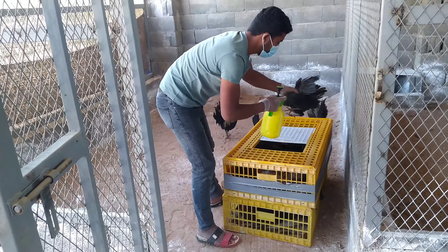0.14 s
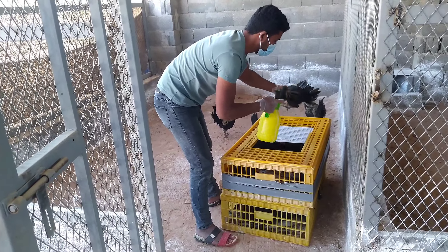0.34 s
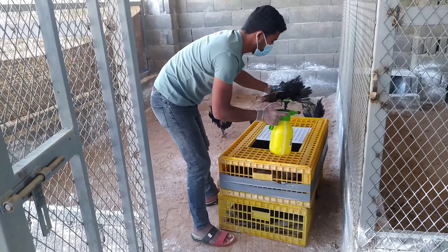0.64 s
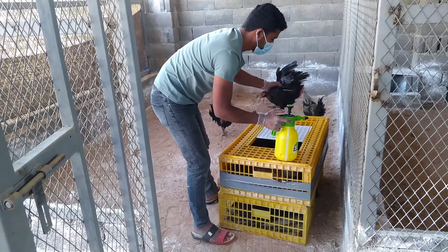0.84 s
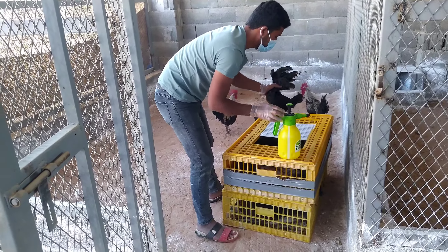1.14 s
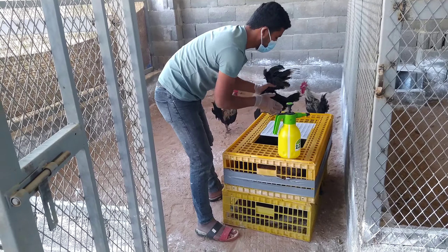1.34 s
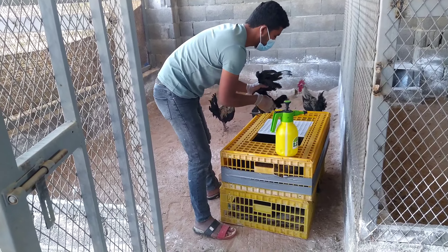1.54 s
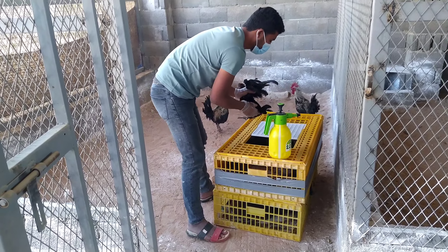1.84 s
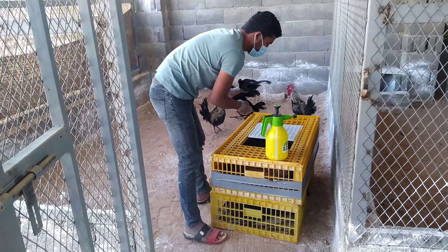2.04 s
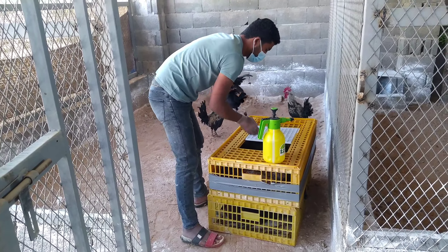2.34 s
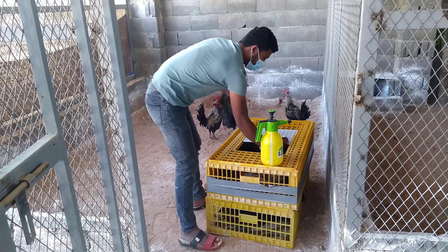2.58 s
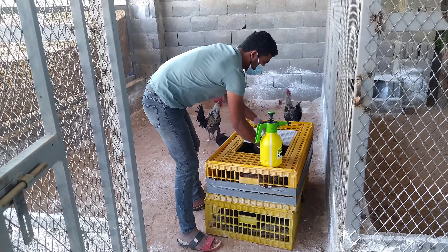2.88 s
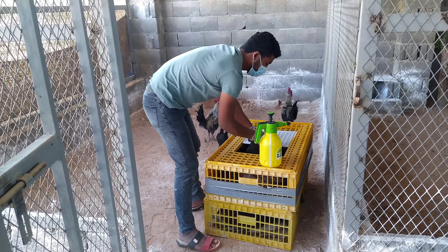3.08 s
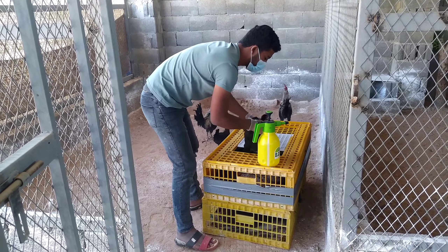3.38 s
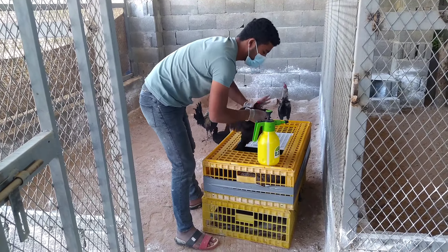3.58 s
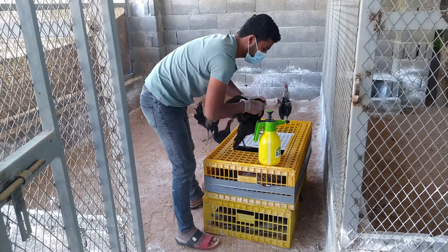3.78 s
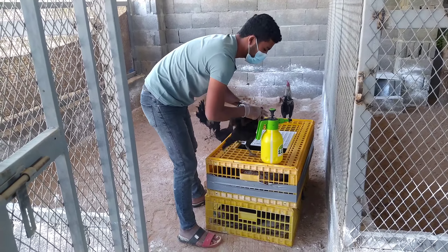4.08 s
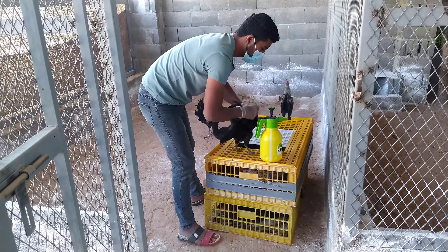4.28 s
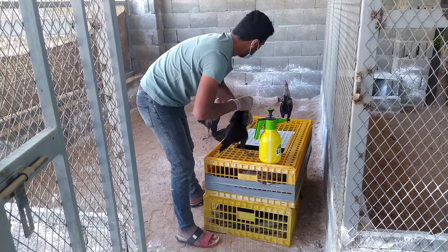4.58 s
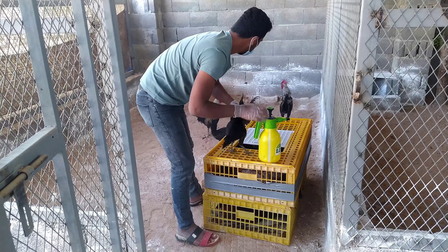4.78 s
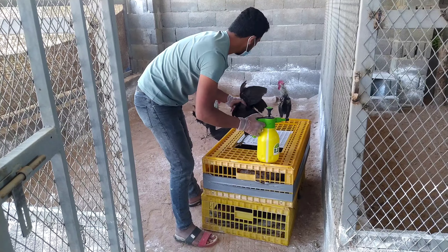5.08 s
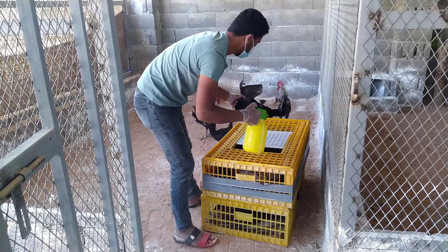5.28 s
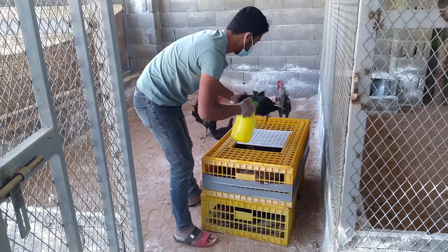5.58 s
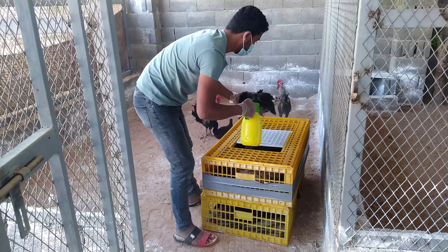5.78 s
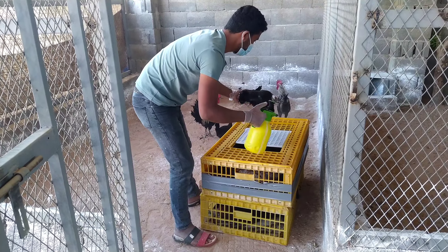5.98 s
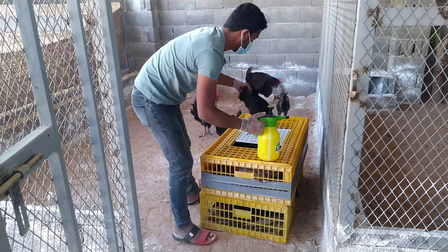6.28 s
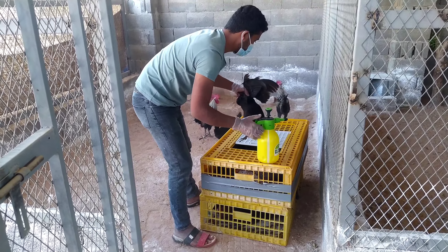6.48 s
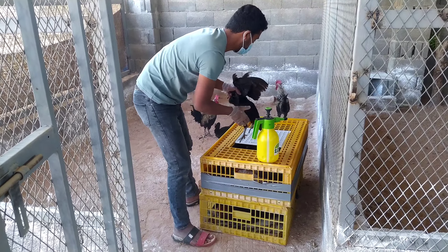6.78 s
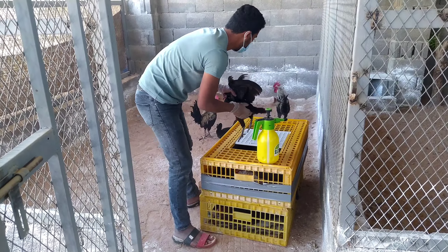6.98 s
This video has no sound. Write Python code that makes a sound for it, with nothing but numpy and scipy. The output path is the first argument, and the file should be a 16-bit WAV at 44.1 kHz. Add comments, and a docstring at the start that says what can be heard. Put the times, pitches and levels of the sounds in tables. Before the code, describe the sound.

Right away a harsh squawk with a whistling edge, then weaker rough cries mixed with low, round clucks. Rustling and ticks on plastic lead to the loudest, sharp squawks mid-way, followed by drawn-out raspy cries. A run of soft clucks follows with faint hens answering behind, and a last breathy, hissing squawk continues to the end. Block-walled pen with brief reverberation, faint outdoor wash, handheld stereo pickup.

```python
"""A hen squawks hoarsely over soft clucks, single notes, bumps, ticks, rustling and faint bursts of high hiss.
She is held over plastic crates in a block-walled pen; a young bird peeps once and hens further back answer.
Her voice is a beating syrinx that breaks into noise, shaped by windpipe, throat and beak; clucks and notes
are sums of sine waves. Crates ring as fading sines; rustle, ticks, high hiss and farmyard wash are coloured
noise. Echoes, scatter and a fading tail stand for the pen around all but the wash."""
import sys
import numpy as np
from scipy import signal
from scipy.fft import rfft, irfft, next_fast_len
from scipy.io import wavfile
from scipy.ndimage import uniform_filter1d, map_coordinates

SR = 44100
rng = np.random.default_rng(int(sys.argv[2]) if len(sys.argv) > 2 else 0)


def unload_audio(sound):
    """Save the sound as a 16-bit wav file, at the path given as the first command line argument."""
    columns = np.transpose(np.atleast_2d(sound))
    # keep every value between -1 and 1, then stretch to whole-number steps
    steps = np.round(np.clip(columns, -1, 1) * 32767)
    wavfile.write(sys.argv[1], SR, steps.astype(np.int16))


N = 314433  # length of the scene in samples
TIME = np.arange(N) / SR  # s

# spectrum of rubbing on the crate: (frequency [Hz], density [dB per Hz])
RUB_COLOUR = [(50, -22), (110, -13), (160, -2), (230, -2), (320, 0), (480, -5), (700, -10), (2000, -19),
              (6000, -31), (9000, -27), (15000, -52)]


def amp(db):
    """Turns decibels into a gain."""
    return 10 ** (np.asarray(db) / 20)


def unit(x):
    """Scales a sound to rms 1."""
    return x / np.sqrt(np.mean(x ** 2) + 1e-20)


def read(points, hz):
    """Reads a table of (frequency, value) along a logarithmic frequency axis."""
    f, value = np.transpose(points)
    return np.interp(np.log(hz + 1), np.log(f + 1), value)


def along(rows, t):
    """Reads every column of a curve at the times t."""
    s, *columns = np.transpose(rows)
    return [np.interp(t, s, column) for column in columns]


def add(mix, s, sound):
    """Adds a sound to the mix at time s, cutting what falls outside."""
    start = round(s * SR)
    sound = sound[max(-start, 0):]
    part = mix[max(start, 0):][:len(sound)]
    part += sound[:len(part)]


def colour(x, points):
    """Filters a sound by a curve of (frequency [Hz], level [dB])."""
    n = x.shape[-1]
    size = next_fast_len(n + 2048)
    gain = amp(read(points, np.fft.rfftfreq(size, 1 / SR)))
    return irfft(rfft(x, size) * gain, size)[..., :n]


def wobble(n, hz):
    """Makes a smooth random curve of about rms 1 that varies at rates up to about hz."""
    size = next_fast_len(n + 4096)
    f = np.fft.rfftfreq(size, 1 / SR)
    smooth = rfft(rng.standard_normal(size)) / (1 + (f / hz) ** 4)
    return unit(irfft(smooth, size))[:n]


def resonate(x, hz, width):
    """Rings like a cavity whose pitch follows hz, with a peak gain of about 1."""
    turn = np.exp(2j * np.pi * np.cumsum(hz * np.ones(len(x))) / SR)
    r = np.exp(-np.pi * width / SR)
    # shift the resonance to zero frequency, smooth there, and shift back
    return 2 * (turn * signal.lfilter([1 - r], [1, -r], x / turn)).real


def resonate_twice(x, hz, width):
    """Passes a sound through two equal resonances, for a steeper peak."""
    return resonate(resonate(x, hz, width), hz, width)


def steady(x):
    """Holds the rms near 1 over some tens of milliseconds, leaving the fast grain."""
    power = uniform_filter1d(uniform_filter1d(x ** 2, size=900), size=900)
    return x / np.sqrt(abs(power) + 1e-12)


def diffuse(pair):
    """Makes two unrelated signals alike in the bass, as at two close microphones."""
    # left-right likeness of diffuse sound: (frequency [Hz], likeness [0-1])
    likeness = [(30, 0.036), (120, 1), (600, 0.71), (900, 0.82), (1250, 0.16), (2000, 0.015),
                (12000, 0.007)]
    n = pair.shape[-1]
    size = next_fast_len(n)
    a, b = rfft(pair, size)
    same = np.clip(read(likeness, np.fft.rfftfreq(size, 1 / SR)), -1, 1)
    return irfft(np.array([a, same * a + np.sqrt(1 - same ** 2) * b]), size)[:, :n]


def strokes(rows, edge):
    """Draws the level of strokes that rise, hold and fall; edge is the share spent rising and falling."""
    level = np.zeros(N)
    for s, length, level_db in rows:
        add(level, s, amp(level_db) * signal.windows.tukey(int(length * SR), edge))
    return level


def pen(x, echo_db, scatter_db, tail_db):
    """Adds first echoes, quick scatter off crates and mesh, and a tail that fades between the walls."""
    # how long the tail rings: (frequency [Hz], time to fall 60 dB [s])
    tail_t60 = [(150, 0.32), (500, 0.24), (1000, 0.4), (2500, 0.31), (5000, 0.28), (10000, 0.21)]
    # echoes off floor, crate and walls, ahead of echo_db: (left delay [s], right delay [s], gain [ratio])
    first_echoes = [(.0031, .0034, .3), (.0074, .0071, .25), (.0132, .0133, .42), (.0205, .0209, .2),
                    (.0271, .0267, .2)]
    scatter_t60, tail_rise = 0.072, 0.019  # s
    size = 32768
    hz, t, z = signal.stft(rng.standard_normal((2, size)), SR, nperseg=256)
    fading = z * amp(-60 * t / read(tail_t60, hz)[:, None])
    tail = signal.istft(fading, SR, nperseg=256)[1][:, :size]
    t = TIME[:size]
    tail = tail * np.clip(t / tail_rise, 0, 1)
    scatter = rng.standard_normal((2, size)) * amp(-60 * t / scatter_t60) * (t > .001)
    scatter = colour(scatter, [(500, -49.5), (1000, 1), (1800, -1)])
    response = diffuse(amp(tail_db) * unit(tail) + amp(scatter_db) * unit(scatter)) / np.sqrt(size)
    response[:, 0] += 1  # the direct sound
    for left, right, gain in first_echoes:
        response[[0, 1], [round(left * SR), round(right * SR)]] += gain * amp(echo_db)
    response = response / np.linalg.norm(response.mean(0))
    return signal.fftconvolve(x[None], response, axes=1)[:, :N]


def air():
    """The quiet wash of the farmyard: coloured noise that drifts and slowly sinks."""
    # spectrum of the wash: (frequency [Hz], density [dB per Hz])
    wash_colour = [(12, -44), (20, 9.5), (119, -0.5), (351, 5.5), (490, 1.5), (878, -3), (1040, 1.5),
                   (1710, 2.5), (2530, 0.5), (4050, -8), (5060, -14.5), (7070, -14.5), (9080, -3.5),
                   (13000, -24.5), (15400, -45)]
    start_db, fall_db_per_s, drift_db = -48, 0.5, 1
    level_db = start_db - fall_db_per_s * TIME + drift_db * wobble(N, 0.72)
    return amp(level_db) * unit(diffuse(colour(rng.standard_normal((2, N)), wash_colour)))


def high_hiss():
    """Faint bursts of high hiss: treble noise that swells and fades."""
    # spectrum of the hiss: (frequency [Hz], density [dB per Hz])
    hiss_colour = [(2000, -47), (5500, -3.5), (7000, -5.5), (9000, 4.5), (11000, -8), (15000, -12)]
    # bursts: (start [s], length [s], level [dB])
    bursts = [(.38, 0.23, -53), (3.985, 0.092, -51), (4.56, 0.26, -56), (5.62, 0.57, -60)]
    return strokes(bursts, edge=0.27) * unit(colour(rng.standard_normal(N), hiss_colour))


def rustle():
    """Feathers and hands brush the plastic in uneven clumps, and the hollow crate booms under them."""
    # rubbing strokes, ahead of gain_db: (start [s], length [s], level [dB])
    rubs = [(.12, 0.034, -42), (2.8, 0.361, -36.5), (3.298, 0.031, -28), (5.28, .62, -55.5),
            (6.66, 0.44, -42.5)]
    gain_db, clump_db = -1, 3.5
    boom_hz, boom_width_hz, boom_db = 167, 17, 8
    clumps = amp(clump_db * wobble(N, 35))
    grains = colour(rng.standard_normal(N) * clumps, RUB_COLOUR)
    boom = amp(boom_db) * resonate(grains, boom_hz, boom_width_hz)
    return amp(gain_db) * strokes(rubs, edge=0.18) * unit(grains + boom)


def crate():
    """Soft blows ring the hollow crate as fading sines; claws and hard edges tick on it as short noise."""
    # dull bumps, ahead of bump_db: (time [s], level [dB], scuff's time to fall 60 dB [s], panel pitch [Hz])
    bumps = [(0.138, -46, 0.16, 336), (0.305, -53, 0.14, 402), (0.683, -39.5, 0.094, 230),
             (1.098, -38, 0.47, 318), (2.27, -40.5, 0.35, 402), (2.574, -37, 0.15, 303),
             (2.809, -37.5, 0.23, 310), (2.837, -36, 0.15, 290), (2.875, -37, 0.13, 464),
             (3.303, -30, 0.058, 304), (3.999, -41, 0.23, 284), (5.011, -39.5, 0.31, 335),
             (6.515, -39.5, 0.56, 410)]
    # ringing tones, their pitch scattered at each bump: (pitch [Hz], level [dB], time to fall 60 dB [s])
    tones = [(165.2, -11.5, 0.8), (212, -6.5, 0.15), (414, -18, 0.63), (569, 7.5, 0.065), (667, 0.5, 0.26)]
    # ticks of claws and plastic: (time [s], level [dB])
    tick_times = [(0.1863, -31.5), (1.165, -42), (1.669, -42.5), (2.804, -29.5), (2.832, -35.5),
                  (2.875, -31), (3.3093, -34), (6.5364, -43.5), (6.856, -37)]
    # spectrum of a tick: (frequency [Hz], density [dB per Hz])
    tick_colour = [(300, -19), (1500, 14), (4000, 12), (6000, 8), (8500, 20), (11000, 9.5), (15000, -12)]
    bump_db, panel_db, sink_db = -2, 11, 4.5
    tick_t60, panel_t60 = 0.12, 0.084  # s
    sink_from_hz, sink_to_hz, sink_s = 324.6, 134, 0.0216
    out = np.zeros(N)
    t = np.arange(SR // 3) / SR
    for s, level_db, scuff_t60, panel_hz in bumps:
        ring = np.zeros(len(t))
        for hz, db, t60 in tones:
            tone = np.sin(2 * np.pi * hz * rng.uniform(.92, 1.08) * t)
            ring += amp(db - 60 * t / t60) * tone * rng.choice([-1, 1])
        panel = amp(panel_db - 60 * t / panel_t60) * np.sin(2 * np.pi * panel_hz * t)
        # a low note slides down after the blow
        sink_hz = sink_to_hz + (sink_from_hz - sink_to_hz) * np.exp(-t / sink_s)
        sink_level = amp(sink_db) * t / sink_s * np.exp(-t / sink_s)
        sinking = sink_level * np.sin(2 * np.pi * np.cumsum(sink_hz) / SR)
        scuff = unit(colour(rng.standard_normal(len(t)), RUB_COLOUR)) * amp(-60 * t / max(scuff_t60, .02))
        soft_start = 1 - np.exp(-t / .004)
        add(out, s, amp(level_db + bump_db) * (ring + panel + sinking + scuff) * soft_start)
    for s, level_db in tick_times:
        tick = unit(colour(rng.standard_normal(len(t)), tick_colour))
        add(out, s, amp(level_db - 60 * t / tick_t60) * tick)
    return out


def murmur():
    """Hens further back answer the clucking with a short run of faint, higher clucks of their own."""
    count, loudest_db, spread_db = 14, -50, 5
    out = np.zeros(N)
    for k, (when, pitch, size) in enumerate(rng.random((count, 3))):
        hz = np.interp(pitch, [0, 1], (950, 1400))
        _, sound = cluck(loudest_db - spread_db * size, hz, 0.031, bend=0.38)
        add(out, np.interp((k + when) / count, [0, 1], (5.27, 5.92)), sound)  # s
    return out


def note(length, start_hz, end_hz, level_db, overtone_db):
    """A soft, nearly pure call with one overtone, which slides and wavers a little."""
    waver_hz = 9
    n = int(length * SR)
    hz = np.linspace(start_hz, end_hz, n) + waver_hz * wobble(SR, 41)[:n]
    phase = 2 * np.pi * np.cumsum(hz) / SR
    tone = unit(np.sin(phase) + amp(overtone_db) * np.sin(2 * phase))
    return amp(level_db) * tone * signal.windows.tukey(n, .5)


def cluck(level_db, hz, length, gritty=1.0, bend=1):
    """A soft low grunt jumps in pitch and loudness; the shut beak favours its second harmonic."""
    lead_db = -12  # a weaker swell goes just before the main one
    t = np.arange(-.03, .06, 1 / SR)
    n = len(t)
    glide = np.interp(t, [-.012, -.002, .006, .016, .04], [.92, .92, 1, 1.02, .92])
    turns = np.cumsum(hz / 2 * glide ** bend * (1 + .035 * wobble(8192, 200)[:n])) / SR
    partials_db = [-12.0, 7.5, -12.5, -35.0, -26.5, -47.0, -64, -27.5]
    tone = unit(sum(amp(db) * np.sin(2 * np.pi * k * turns) for k, db in enumerate(partials_db, 1)))
    grit_colour = [(120, -30.0), (330, 7), (580, 1), (750, 18.5), (1080, 15.5), (1600, -7),
                   (2500, -4.0), (5000, -17.0), (12000, -23.5)]
    grit = unit(colour(rng.standard_normal(8192), grit_colour))[:n]
    swell = np.exp(-((t - .01) / length) ** 2) + amp(lead_db) * np.exp(-((t + .008) / .006) ** 2)
    return t[0], amp(level_db) * swell * (tone + gritty * grit)


def whistles(drive, t):
    """Sharp throat resonances whistle through the rasp; also gives the share of power they take."""
    # one curve a whistle: (time [s], pitch [Hz], share of the throat's power [0-1])
    curves = [
        [(.092, 1855, 0.8), (.125, 1960, 0.8), (.15, 1930, 0.75), (.19, 1737, 0.65), (.228, 1510, .2)],
        [(.252, 2640, 0.4), (.28, 2700, 0.7), (.305, 2520, 0.04)],
        [(.628, 1430, .3), (.715, 1535, 0.62), (.755, 1560, 0.45), (.8, 1510, 0.1)],
        [(.65, 2310, 0), (.735, 2660, 0.06), (.775, 2310, 0), (.86, 2220, 0.14)],
        [(3.99, 2100, .4), (4.045, 2360, 0.45), (4.11, 2120, 0), (4.16, 2230, 0.4), (4.21, 2130, 0),
         (4.29, 2480, 0.2)],
        [(6.61, 2530, .45), (6.74, 2700, 0), (6.86, 2520, .05), (6.96, 2810, 0.13), (7.12, 2630, .15)],
    ]
    width_hz, edge_s = 113, 0.0135
    sound, taken = np.zeros((2, len(t)))
    for curve in curves:
        start, end = curve[0][0], curve[-1][0]
        if start < t[-1] and end > t[0]:
            hz, share = along(curve, t)
            fade = np.clip(np.minimum(t - start, end - t) / edge_s + .5, 0, 1)
            share = np.clip(share, 0, 1) * fade
            sound += np.sqrt(share) * steady(resonate_twice(drive, hz, width_hz))
            taken += share
    return sound, np.minimum(taken, 1)


def pulses(turns, offset):
    """Adds 16 cosines into sharp beats; an offset of 0.5 puts them on the half harmonics."""
    return unit(sum(np.cos(2 * np.pi * (k + offset) * turns) / np.sqrt(k) for k in range(1, 17)))


def syrinx(t, pitch, rough):
    """The voice organ beats, and as it grows rough its beats give way to puffs of noise."""
    # strong and weak beats alternate, which adds half harmonics: (time [s], depth [0-1])
    doubling = [(4.02, 0.3), (4.12, 0.64), (4.24, 0.6), (4.32, .05)]
    jitter, forced, breath = .042, 0.36, 4.67
    rattle, rattle_hz = 0.2, 130
    roll_hz, roll_depth, roll_stray = 70, 0.4, 0.17  # a hoarse voice rolls in uneven pulses
    n = len(t)
    turns = np.cumsum(pitch * (1 + jitter * (rough + 0.044) * wobble(SR, 207.4)[:n])) / SR
    beats = pulses(turns, 0) + along(doubling, t)[0] * pulses(turns, .5)
    beats = beats * (1 + forced * rough)
    # air escapes in a puff every cycle
    puffs = unit((0.32 + np.exp(-(turns % 1) / 0.5)) * rng.standard_normal(SR)[:n])
    roll = np.cos(2 * np.pi * np.cumsum(roll_hz * (1 + roll_stray * wobble(SR, 33.3)[:n])) / SR)
    flutter = np.exp(rough * (rattle * wobble(SR, rattle_hz)[:n] + roll_depth * roll))
    drive = ((1 - rough ** 2) * beats + breath * rough ** 1.32 * puffs) * flutter
    return drive, puffs * flutter


def squawk(curve):
    """The syrinx sounds through windpipe, throat and open beak, with rasp and hiss above."""
    # the syrinx slips between clear tone and noise:
    # (time [s], pitch [Hz], roughness [0-1], windpipe resonance [Hz])
    voice = [(.06, 733.4, 0, 780), (.082, 746, 0.33, 780), (.102, 870, 0.65, 800), (.13, 920, 0.5, 820),
             (.2, 795, 0.79, 850), (.24, 695.5, 0.5, 735), (.27, 671.3, 0.31, 696), (.31, 644, 0.63, 710),
             (.62, 747.3, 0.6, 905), (.715, 760.4, 0.56, 860), (.76, 790, 0.57, 895), (.81, 753, 0.9, 790),
             (.85, 681, 0.7, 694), (.9, 694, 0.83, 874), (1.24, 712, 0.48, 800), (1.285, 810, 0.62, 816),
             (1.33, 858, 0.42, 895), (1.4, 867, 0.62, 880), (1.44, 811.6, 0.73, 820),
             (1.48, 750, 0.57, 780), (1.87, 788, 0.4, 780), (1.96, 839, 0.8, 770), (2.07, 789, 0.8, 770),
             (2.17, 688, 0.8, 760), (2.5, 799, 0.41, 845), (2.61, 803, 0.8, 850), (2.77, 832, 0.78, 814),
             (2.86, 698, 0.68, 794), (2.905, 667.7, 0.65, 780), (2.932, 749.6, 0.23, 800),
             (2.957, 994, 0.12, 970), (2.972, 942.6, 0.32, 1030), (2.98, 723, 0.38, 750),
             (3.02, 703, 0.42, 745), (3.05, 718, 0.42, 760), (3.09, 692, 0.38, 780), (3.12, 656, 0.66, 750),
             (3.31, 738.5, 0.49, 910), (3.345, 737, 0.45, 960), (3.385, 714, 0.17, 755),
             (3.435, 696, 0.17, 730), (3.448, 673, 0.21, 695), (3.47, 697, 0.75, 880),
             (3.535, 716, 0.41, 930), (3.58, 716, 0.93, 850), (3.85, 800, 0.73, 930), (3.98, 740, 0.8, 950),
             (4.015, 750, 0.65, 1020), (4.07, 767, 0.65, 940), (4.12, 716.5, 0.43, 884),
             (4.16, 754.7, 0.46, 900), (4.21, 725, 0.52, 920), (4.25, 782, 0.49, 920), (4.31, 798, .9, 960),
             (4.5, 827, 0.98, 830), (4.8, 908.7, 0.8, 912), (4.97, 972, 0.77, 1030), (5.06, 882, 0.74, 916),
             (5.21, 858, 1.02, 900), (6.6, 876.5, 0.74, 900), (6.72, 1000, 0.94, 1000),
             (6.86, 886, 1.01, 890), (6.96, 925, 0.82, 944), (7.12, 899.6, 0.7, 880)]
    # shape of the mouth, the beak's width averaged over a squawk and the pharynx gain ahead of its trim:
    # (time [s], beak resonance width [Hz], pharynx resonance [Hz], pharynx gain [dB], rasp centre [Hz])
    mouth = [(.07, 900, 1430, 13, 3700), (.12, 700, 1820, -22, 3870), (.23, 1190, 1590, 0, 3730),
             (.29, 900, 1810, 11.5, 4100), (.63, 810, 1530, 1, 3800), (.78, 925, 1550, -3.5, 3300),
             (.89, 1120, 1580, 3.5, 3700), (1.25, 890, 1590, 3, 4460), (1.48, 990, 1570, 0, 4370),
             (1.87, 914, 1690, 1.5, 3660), (2.16, 1040, 1450, -4, 4140), (2.5, 1130, 1510, -26, 4070),
             (2.91, 950, 1320, 4, 4300), (2.97, 750, 1580, -17, 4500), (3.03, 1010, 1490, -15, 4330),
             (3.1, 1150, 1550, 6, 4400), (3.32, 744, 1620, -20, 3880), (3.56, 790, 1570, -37, 3570),
             (3.86, 1010, 1540, -2.5, 4580), (4.04, 950, 1450, -7, 4800), (4.1, 1100, 1430, -5, 3140),
             (4.17, 1200, 1360, -4, 3340), (4.28, 1110, 1340, -12, 3640), (4.48, 900, 1380, -17, 3740),
             (4.8, 1186, 1395, -10, 3600), (5.2, 1150, 1350, -17, 3700), (6.6, 850, 1520, -11, 4400),
             (6.88, 940, 1440, -13, 4040), (7.12, 1090, 1590, -7, 4160)]
    # the throat's main band: (frequency [Hz], gain [dB])
    throat_colour = [(300, -27), (850, -54), (1150, 9), (1600, 3), (2000, 1.5), (2800, 3), (3300, -3.5),
                     (4000, 7), (6000, -29)]
    # the rasp above it: (frequency [Hz], gain [dB])
    rasp_colour = [(1500, -10), (2700, -55), (3100, 9), (3500, 6.5), (4300, 2.5), (4750, 0.5),
                   (5250, -13.5), (7000, -50), (12000, -25)]
    # the hiss at the beak: (frequency [Hz], gain [dB])
    beak_hiss_colour = [(3290, -22), (5600, -2.5), (7400, 1.5), (8270, 8), (8700, 8.5), (9510, 4),
                        (11700, -12.5), (12100, -13.5), (14400, -26), (15400, -62)]
    lead_s, attack_s, release_s, release_db_per_s = .006, 0.0022, 0.078, 302
    open_s, open_db = 0.027, -1  # the treble comes in as the beak first opens
    pharynx_width, rasp_width, pipe_width = 480, 1100, 340  # Hz
    tremor_db, pharynx_trim_db, rasp_even = 1.0, -2, 0.47
    throat_db, pipe_db, rasp_db, hiss_db = 1.5, 1.0, 1.0, -0.1

    start, end = curve[0][0] - lead_s, curve[-1][0]
    t = np.arange(start, end + release_s, 1 / SR)
    level_db, beak_hz, low_db, high_db, top_db = along(curve, t)
    pitch, rough, pipe_hz = along(voice, t)
    beak_width, pharynx_hz, pharynx_db, rasp_hz = along(mouth, t)
    release_db = release_db_per_s * np.maximum(t - end, 0)
    effort_db = level_db - release_db + tremor_db * wobble(SR, 13.0)[:len(t)]
    drive, gusts = syrinx(t, pitch, np.clip(rough, 0, 1))

    beak = resonate_twice(drive, beak_hz, beak_width.mean())
    pharynx = amp(pharynx_db + pharynx_trim_db) * resonate_twice(drive, pharynx_hz, pharynx_width)
    whistle, share = whistles(drive, t)
    throat = np.sqrt(1 - share) * steady(colour(beak - pharynx, throat_colour)) + whistle
    pipe = resonate_twice(drive, pipe_hz, pipe_width)
    pipe = colour(pipe, [(250, -11), (520, -1), (690, 3), (1300, 3), (2500, -2)])
    rasp = colour(rasp_even * drive + resonate(drive, rasp_hz, rasp_width), rasp_colour)
    hiss = colour(drive + gusts / 2, beak_hiss_colour)

    opening_db = open_db * np.maximum(1 - (t - start) / open_s, 0)
    parts = [(throat, throat_db), (pipe, pipe_db + low_db),
             (rasp, rasp_db + high_db + opening_db), (hiss, hiss_db + top_db + opening_db)]
    edges = np.minimum(np.minimum(t - start, t[-1] - t) / attack_s, 1)
    return start, sum(amp(effort_db + db) * steady(x) for x, db in parts) * edges


def pieces(start, sound):
    """Cuts a sound into overlapping pieces that fade into each other."""
    hop = int(.3 * SR)  # a new piece every 0.3 s
    for centre in range(0, len(sound) + hop, hop):
        at = np.arange(max(centre - hop, 0), min(centre + hop, len(sound)))
        if len(at):
            fade = np.cos(np.pi / 2 * (at - centre) / hop) ** 2
            yield start + at[0] / SR, sound[at] * fade


def scene():
    """Sets the held hen, the flock on the floor, the crate and the high hiss in the pen, over the wash."""
    # (time [s], level [dB], loudest partial before its glide [Hz], half length [s], grit re tone [ratio])
    clucks = [(0.009, -47, 774, 0.039, 1.85), (0.917, -34, 802, 0.011, 0.2),
              (1.087, -28.5, 879, 0.016, 0.63), (1.651, -26.5, 924, 0.012, 0.55),
              (1.845, -27, 906, 0.013, 0.29), (2.256, -28, 892, 0.021, 0.81), (2.46, -29, 830, 0.015, 0.58),
              (2.664, -33, 800, 0.021, 0.44), (2.833, -30.5, 805, 0.017, 0.73),
              (3.247, -34, 945, 0.024, 1.74), (3.84, -39, 940, 0.013, 0.55),
              (4.715, -40.5, 1027, 0.014, 0.45), (4.775, -30.5, 898, 0.016, 0.55),
              (5.176, -32.5, 943, 0.032, 0.82), (5.375, -24.5, 880, 0.014, 0.39),
              (5.572, -25, 861, 0.016, 0.32), (5.777, -32.5, 835, 0.021, 0.56),
              (5.968, -24, 907, 0.014, 0.31), (6.207, -24.5, 918, 0.014, 0.33)]
    # soft notes of the flock:
    # (time [s], length [s], start pitch [Hz], end pitch [Hz], level [dB], overtone re main tone [dB])
    notes = [(0.492, 0.16, 1200, 1300, -57.5, -8), (1.451, 0.26, 2964, 2925, -52, -40),
             (2.216, 0.056, 403, 389, -37.5, -26), (2.689, 0.1, 792, 800, -47, -8),
             (3.691, 0.042, 786, 800, -45, -31), (4.57, 0.046, 341, 315, -42.5, 3.5),
             (5.518, 0.04, 1330, 1450, -44, -16), (5.778, 0.037, 784, 834, -25.5, -28),
             (5.8, 0.13, 785, 826, -45, -24)]
    # one curve a squawk, the last three columns re effort and ahead of the trims in squawk():
    # (time [s], effort [dB], beak resonance [Hz], windpipe [dB], rasp [dB], hiss [dB])
    cries = [
        [(0.068, -32.5, 1840, -25, -21, -16), (0.092, -31.5, 1860, -8, -13, -15),
         (0.134, -25.5, 1910, -7, -11.5, -26), (0.166, -28, 1930, -22, -8, -15),
         (0.196, -25, 2020, -8.5, -7.5, -12), (0.25, -27, 2120, -12, -10.5, -10),
         (0.284, -28.5, 2420, -3, -14, -15), (0.3, -30, 2040, -12, -16.5, -13.5)],
        [(0.625, -43.5, 2240, -1, -15, -12), (0.643, -38.5, 2220, -12, -12.5, -13),
         (0.711, -31.5, 2640, -18, -16, -20), (0.78, -30, 2500, -13, -3.5, -9),
         (0.835, -32, 2430, -9, -7.5, -13), (0.863, -36, 2240, -5, -13, -11), (0.89, -39, 2100, -10, -17, -15)],
        [(1.248, -43.5, 2130, 2, -17, -8), (1.268, -36, 2140, -7, -9, -18), (1.286, -35.5, 2260, 5.5, -12, -26),
         (1.39, -36, 2210, -27, -5.5, -18), (1.43, -28.5, 2130, -10, -13, -28),
         (1.446, -30, 2120, -1, -13, -19), (1.48, -38.5, 1710, 1, -23, -28)],
        [(1.872, -39, 2180, -10, -6, -16), (1.888, -35, 2320, -12, -6, -12), (1.93, -35, 2430, -10, -9, -13.5),
         (2.01, -27, 2380, -18, -10, -8.5), (2.068, -24, 2180, -4.5, -11.5, -12.5),
         (2.134, -28, 2200, -17, -12, -15), (2.165, -31.5, 1960, -6.5, -15, -19)],
        [(2.5, -36.5, 1640, -13, -10, -17), (2.528, -36.5, 1830, -7, -10, -15),
         (2.61, -38.5, 1790, -7, -14, -20)],
        [(2.757, -43, 1690, -15, -16, -21), (2.783, -34, 1760, -13, -10, -16),
         (2.815, -32.5, 1900, -12, -16, -16), (2.855, -38.5, 1870, -4, -8, -21)],
        [(2.908, -39, 2030, -15, -13, -8), (2.92, -31, 1940, -11, -10, -5), (2.944, -37, 1940, 8, -22, 2),
         (2.956, -24, 1950, -15, -5, -19), (2.966, -21, 2010, -1.5, -4, -0.5),
         (3.018, -13.5, 1940, -10.5, -14.5, -19), (3.052, -19, 2220, -4, -3.5, -9),
         (3.08, -16, 2320, -6, -8, -20), (3.105, -24, 1960, -12, -15, -18)],
        [(3.312, -34.5, 2250, 2.5, -12, -15), (3.336, -25.5, 2290, -10, -7.5, -7.5),
         (3.38, -25.5, 2310, 0.5, -5.5, -5), (3.44, -18, 2480, -15.5, -8.5, -7), (3.46, -31, 2130, -13, -9, -2),
         (3.486, -20.5, 2250, -13, -9, -12), (3.494, -25, 2380, -11, -3, -5),
         (3.524, -17.5, 2320, -11.5, -12, -9), (3.57, -30, 2320, -16, -11.5, -11)],
        [(3.835, -51.5, 2100, -3, -13, -9), (3.9, -38, 2330, -9, -5, -6.5), (3.985, -29, 2220, -10, -9, -11),
         (4.005, -24, 2280, -9.5, -6, -14.5), (4.092, -28, 2030, -1, -14, -16.5),
         (4.196, -20.5, 2090, -10.5, -13.5, -15), (4.332, -24, 2370, -4, -7.5, -7),
         (4.374, -29.5, 2448, -1, -3, -4.5), (4.47, -30.5, 2410, 0, -8.5, -12.5),
         (4.495, -34, 2400, -14, -7, -10)],
        [(4.765, -54, 2360, -15, -3, -1), (4.81, -35, 2560, -2, -4, -10.5),
         (4.842, -31.5, 2530, -4, -3.5, -6.5), (4.904, -31.5, 2700, -8.5, -8.5, -8),
         (4.96, -28, 2710, -5, -4.5, -3.5), (5.01, -25.5, 2720, -10.5, -12, -5.5),
         (5.078, -27.5, 2660, -6.5, -13.5, -10.5), (5.158, -27.5, 2460, -6, -9, -8),
         (5.18, -34, 2530, -5, -5, -3), (5.21, -35, 2480, -7, -5.5, -5.5)],
        [(6.56, -53, 2400, -9, -8, -3), (6.615, -47.5, 2540, -1.5, 1, 0.5),
         (6.693, -37, 2620, -5.5, -3.5, -2.5), (6.867, -32.5, 2330, -1.5, 1, -3),
         (6.929, -35, 2560, -3.5, -0.5, -5.5), (6.995, -28, 2640, -5.5, -1, -4.5),
         (7.085, -34.5, 2620, -1.5, -2.5, -4.5), (7.12, -31.5, 2580, -2, 0, -1)],
    ]
    background = air()
    handling = pen(rustle() + crate() + high_hiss(), echo_db=-17.0, scatter_db=6.5, tail_db=-9.0)
    flock = murmur()
    for s, *call in notes:
        add(flock, s, note(*call))
    for s, *call in clucks:
        lead, sound = cluck(*call)
        add(flock, s + lead, sound)
    flock = pen(flock, echo_db=-4, scatter_db=-8, tail_db=-13)
    hen = np.zeros((2, N))
    for curve in cries:
        # the hen keeps moving in the hand, so the scatter changes as she cries
        for s, cry in pieces(*squawk(curve)):
            for side, heard in zip(hen, pen(cry, echo_db=-6.0, scatter_db=5.0, tail_db=-3.5)):
                add(side, s, heard)
    return hen + handling + flock + background


def record(dry):
    """A hand-held microphone pair sways, so one side drifts in time; tone balance, soft peaks, band limit."""
    # left against right: (frequency [Hz], left minus right [dB])
    balance = [(100, 0.5), (700, 0.5), (1300, 2.1), (2400, 5.5), (4200, 0), (8500, -0.5), (13000, 3.5)]
    ceiling, edge_hz, sway_s, sway_hz = .85, 15250, 2.2e-5, .27
    left = colour(dry[0], [(hz, db / 2) for hz, db in balance])
    right = colour(dry[1], [(hz, -db / 2) for hz, db in balance])
    shift = sway_s * np.sin(2 * np.pi * (sway_hz * TIME + rng.random()))
    right = map_coordinates(right, [(TIME + shift) * SR], order=3, mode="nearest")
    rounded = ceiling * np.tanh(np.array([left, right]) / ceiling)
    low_pass = signal.firwin(511, edge_hz, window=("kaiser", 9), fs=SR)
    return signal.oaconvolve(rounded, low_pass[None], "same")


dry = scene()
out = record(dry)
unload_audio(out)
```